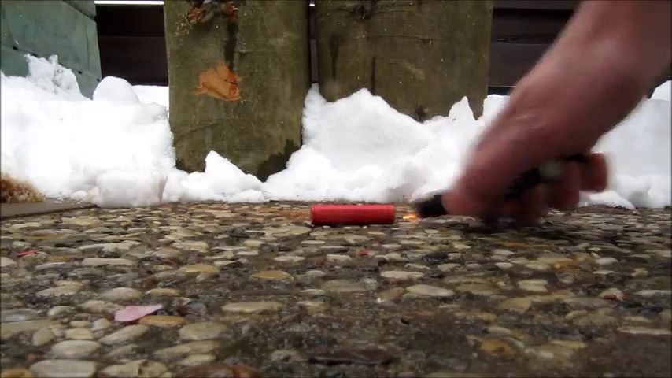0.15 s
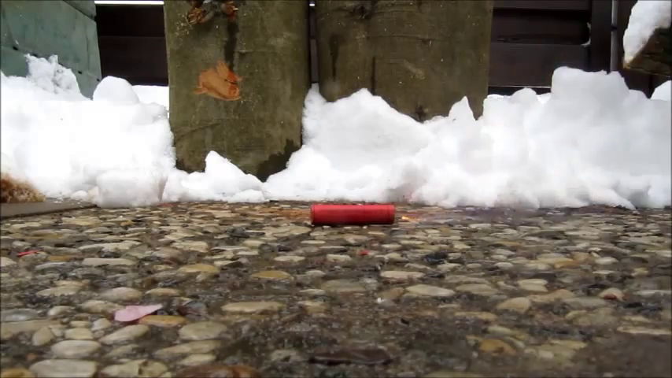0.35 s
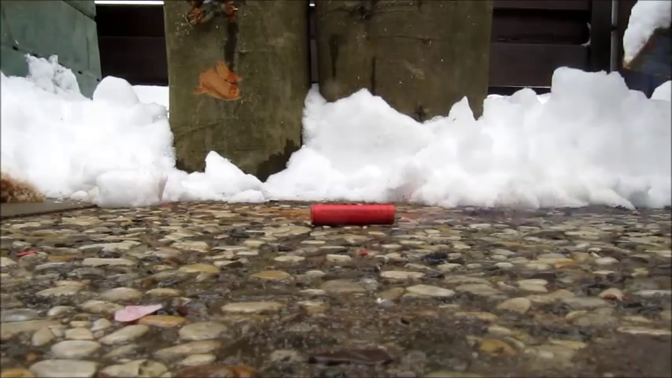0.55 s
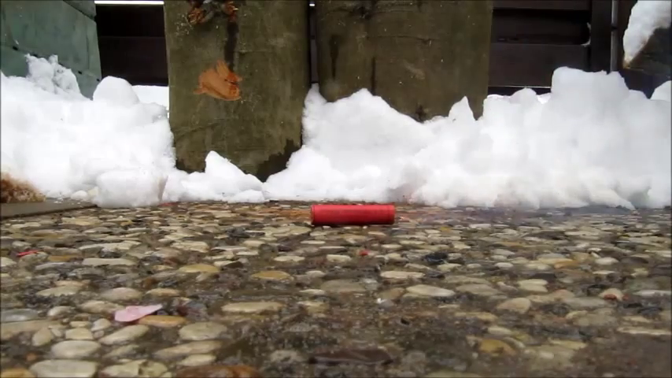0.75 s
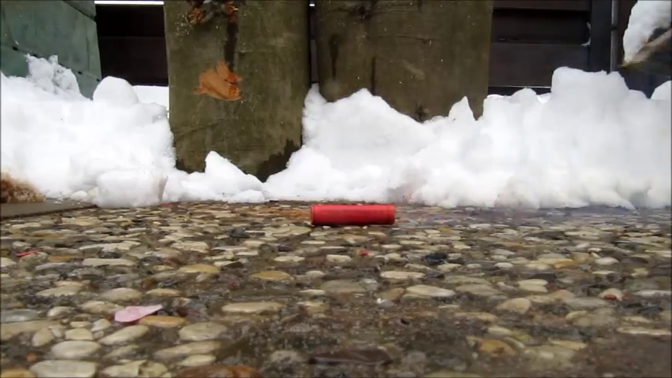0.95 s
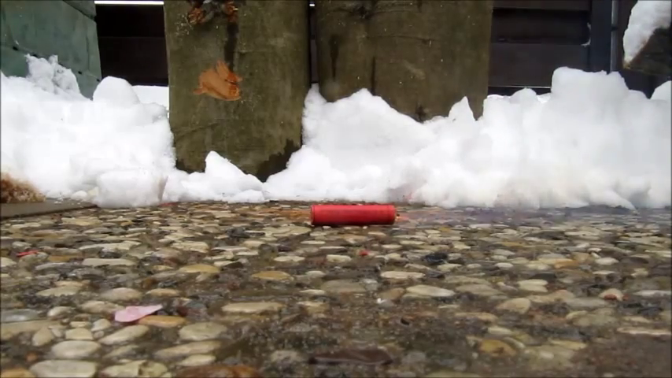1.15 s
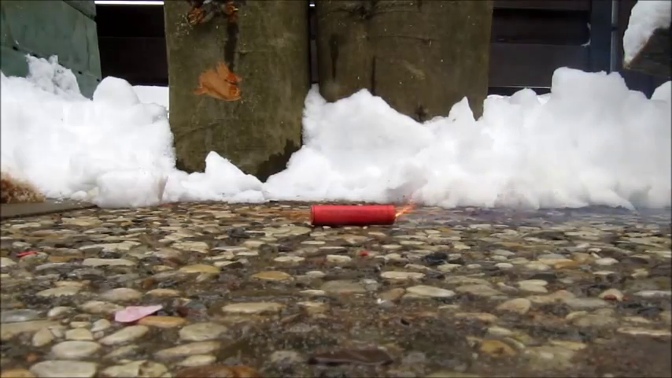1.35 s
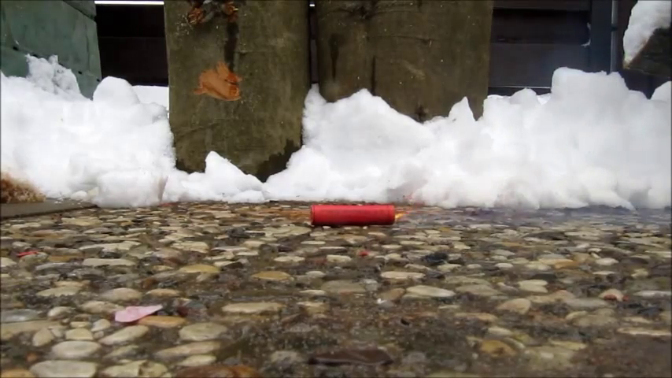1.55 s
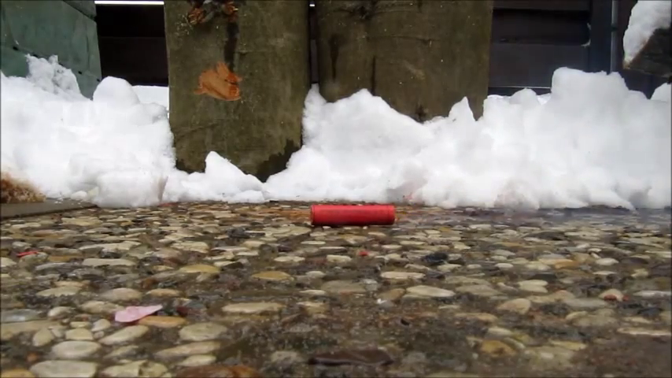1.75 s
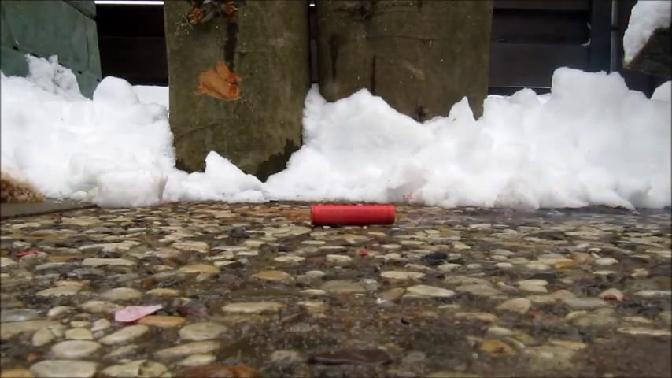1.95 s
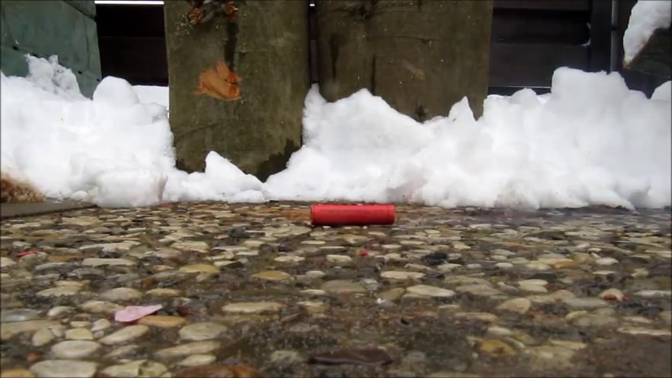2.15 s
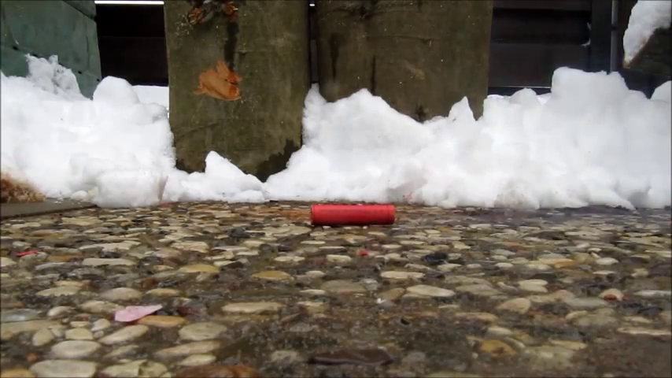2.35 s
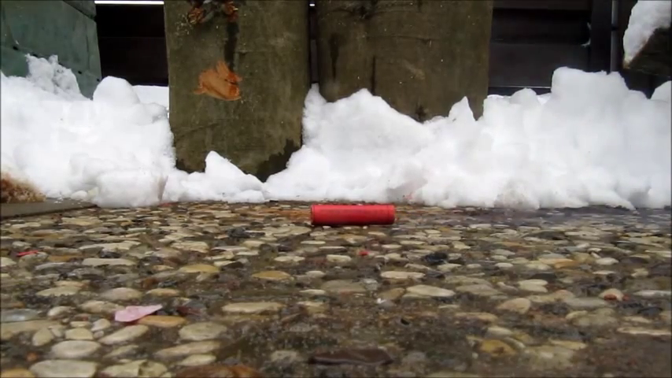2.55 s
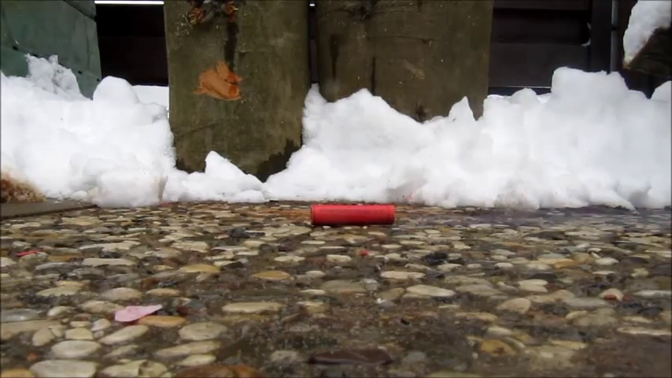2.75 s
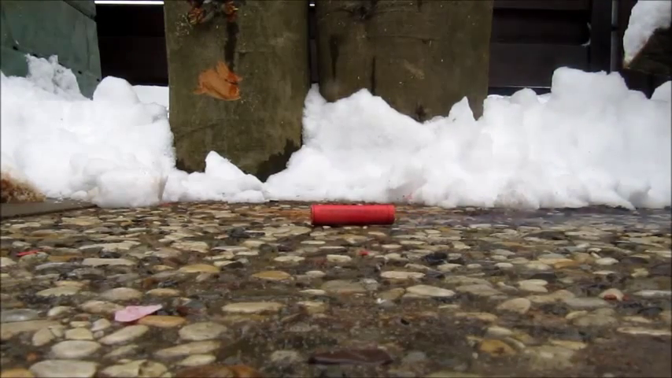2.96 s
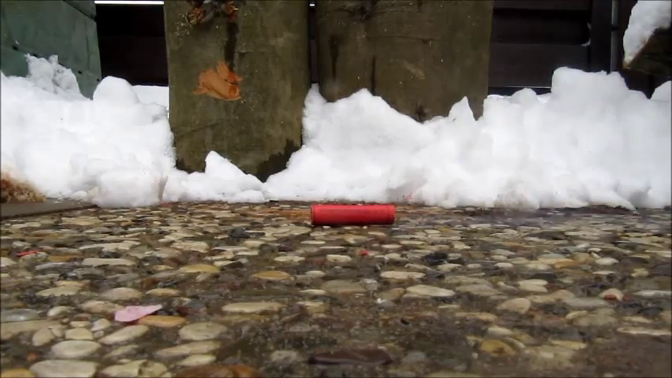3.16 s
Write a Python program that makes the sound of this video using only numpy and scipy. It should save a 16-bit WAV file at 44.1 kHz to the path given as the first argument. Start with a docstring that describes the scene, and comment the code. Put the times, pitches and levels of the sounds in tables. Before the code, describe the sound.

Firecracker fuse hisses and sputters harder and harder outdoors after a lighter clicks off, then chokes out

```python
"""Outdoors on pebbles between banks of snow, almost no echo: a gas lighter, shaped noise, hisses at a firecracker's
fuse and snaps shut with ringing knocks. The fuse, popping grains in a smooth hiss, sputters ever harder with a few
cracks of noise from large sparks, burns into the tube and blows a thin bright jet. Its gas buffets the small
microphone with low noise and single swings of pressure, then the flame chokes off to a faint smoulder.
Distant air, a quiet filtered noise, lies under it all."""
import sys
import numpy as np
from scipy import signal
from scipy.fft import rfft, irfft, next_fast_len
from scipy.io import wavfile
from scipy.ndimage import uniform_filter1d

SR = 44100
rng = np.random.default_rng(int(sys.argv[2]) if len(sys.argv) > 2 else 0)


def volts(x):
    """Linear amplitude factor 10**(x/20) for a level x in dB, scalar or array-like."""
    e = np.asarray(x, float) / 20
    return 10 ** e


def wrap_up_sound(samples):
    """Save the sound to the file named by the first command line argument, as 16-bit audio."""
    columns = np.atleast_2d(samples).T
    # keep every value between -1 and 1, then stretch to whole-number steps
    tamed = np.clip(columns, -1, 1)
    steps = np.round(tamed * 32767).astype(np.int16)
    wavfile.write(sys.argv[1], SR, steps)


N = 143325  # samples, 3.25 s


def evened(x):
    """Scales to rms 1."""
    return x / np.sqrt(np.mean(x ** 2) + 1e-20)


def curve(rows):
    """Joins (s, value) rows by straight lines."""
    s, value = np.transpose(rows)
    return np.interp(np.arange(N) / SR, s, value)


def colour(x, points):
    """Gives a sound the spectrum of (Hz, dB) points by a causal minimum-phase filter, at rms 1."""
    point_hz, point_db = np.transpose(points)
    hz = abs(np.fft.fftfreq(8192, 1 / SR))
    db = np.interp(np.log(hz + 1), np.log(point_hz + 1), point_db)
    log_gain = np.log(volts(np.maximum(db, -100)))
    # the Hilbert transform of the log gain is the phase that keeps the filter causal
    taps = np.fft.ifft(np.exp(np.conj(signal.hilbert(log_gain)))).real[:4096]
    return evened(signal.oaconvolve(x, taps)[:len(x)])


def chance(seconds):
    """Smooth random wander of rms 1: noise averaged twice over the given span."""
    size = max(round(seconds * SR), 2)
    once = uniform_filter1d(rng.standard_normal(N), size)
    return evened(uniform_filter1d(once, size))


def add(mix, s, sound):
    """Mixes a sound in at a time, cut at the end of the mix."""
    part = mix[round(s * SR):][:len(sound)]
    part += sound[:len(part)]


def lighter():
    """Gas flow as coloured noise, shut off as the lever snaps back in quick knocks of decaying modes."""
    # gas flow: time_s, level_db
    gas = [(0.0, -46.5), (0.086, -39.5), (0.196, -38), (0.205, -39)]
    # spectrum of the gas hiss: frequency_hz, relative_density_db
    gas_colour = [(180, -45), (300, -16.5), (331, -15), (404, -20), (431, -11), (553, -5.5), (720, -12),
                  (877, -10.5), (1370, -6.5), (1490, -9.5), (1870, -4.5), (4070, -5), (5850, -12.5),
                  (6900, -1), (7620, -7.5), (9140, -8.5), (10800, 0.5), (13400, -18), (15500, -29)]
    # knocks of the lever: start_s, peak_db
    snap = [(.2152, -22), (.21533, -11), (.21604, -12)]
    # ringing modes of the lever: pitch_hz, level_db (before differencing), t60_s
    lever = [(1900, -6, .004), (4200, -1, .0025), (5100, -4, .0025), (5900, 0, .0025), (7300, -5, .0025),
             (8800, -2, .005), (10000, 0, .0045), (11500, -8, .0025), (13800, -13, .0025)]
    gas_off_s, closing_s, rise_s = .216, 0.0051, .0001
    t, ring_s = np.arange(N) / SR, np.arange(800) / SR

    valve = np.clip((gas_off_s - t) / closing_s, 0, 1)
    out = colour(rng.standard_normal(N), gas_colour) * volts(curve(gas)) * valve

    knock = np.zeros(len(ring_s))
    for hz, db, t60 in lever:
        knock += volts(db - 60 * ring_s / t60) * np.sin(2 * np.pi * hz * ring_s)
    # differencing tilts the ring towards the treble
    knock = np.diff(knock * np.minimum(ring_s / rise_s, 1), prepend=0)
    knock /= abs(knock).max()
    for s, peak_db in snap:
        add(out, s, volts(peak_db) * knock)
    return out


def distant_air():
    """Distant outdoor air: steady noise, strongest in the low and middle range."""
    # spectrum of the air: frequency_hz, relative_density_db
    air_colour = [(88, -37), (150, -3.5), (384, -7.5), (457, 0), (939, -5.5), (1340, -10), (1760, -11),
                  (5000, -20), (12000, -31), (15500, -40)]
    return volts(-66.5) * colour(rng.standard_normal(N), air_colour)


def buffeting():
    """Gas striking the microphone: lumpy low rumble whose stronger gusts reach higher."""
    # strength of the gusts: time_s, level_db (before lumps and steadying)
    buffet = [(0.0, -70), (0.08, -66), (0.11, -58), (0.18, -59.5), (0.24, -68), (0.32, -60), (0.35, -67),
              (0.45, -66), (0.56, -68), (0.66, -61.5), (0.82, -59), (0.88, -65), (0.94, -56), (0.97, -56),
              (1.17, -56), (1.26, -51), (1.3, -54), (1.43, -50.5), (1.46, -46), (1.53, -52), (1.55, -39),
              (1.57, -47), (1.59, -35), (1.6, -40), (1.63, -57), (1.71, -44), (1.73, -55), (1.76, -40),
              (1.81, -46.5), (1.85, -40), (1.95, -33.5), (1.97, -40), (2.06, -35.5), (2.08, -44),
              (2.1, -36), (2.12, -37), (2.14, -63), (2.18, -41.5), (2.23, -41), (2.25, -39), (2.29, -48),
              (2.32, -35), (2.38, -47), (2.41, -39), (2.47, -45), (2.49, -50), (2.52, -53), (2.55, -39),
              (2.59, -51.5), (2.69, -52.5), (2.73, -37.5), (2.74, -38.5), (2.81, -53), (2.91, -64),
              (2.94, -62), (2.97, -47.5), (3.05, -76), (3.1, -62), (3.15, -63), (3.25, -60)]
    # spectrum of weak gusts: frequency_hz, relative_density_db
    soft = [(15, -32), (25, 5), (54, 7.5), (97, -2.5), (134, -8.5), (243, -10), (344, -13.5), (400, -19),
            (520, -43), (880, -120)]
    # spectrum of strong gusts: frequency_hz, relative_density_db
    strong = [(12, -52), (20, 7.5), (54, -3.5), (86, 3), (123, -2.5), (229, -7), (456, -18.5), (503, -26.5),
              (1000, -31), (1300, -32), (2200, -120)]
    soft_db, strong_db = -66, -31.5  # levels with the purely weak and purely strong colour
    lump_db, lump_s, steady_s = 1.5, .01, 0.015

    level_db = curve(buffet) + lump_db * chance(lump_s)
    strength = np.clip((level_db - soft_db) / (strong_db - soft_db), 0, 1)
    noise = rng.standard_normal(N)
    gust = (1 - strength) * colour(noise, soft) + strength * colour(noise, strong)
    # dividing by the local power steadies the gusts over this span
    size = round(steady_s * SR)
    power = uniform_filter1d(uniform_filter1d(gust ** 2, size), size)
    return volts(level_db) * gust / np.sqrt(abs(power) + 0.15)


def patchy(x):
    """Lets patches of the spectrum, about 1.2 kHz by 50 ms, swell and sink a little."""
    patch_db = 0.99  # rms
    z = signal.stft(x, nperseg=512)[2]
    across_pitch = uniform_filter1d(rng.standard_normal(z.shape), 14, 0)
    field = evened(uniform_filter1d(across_pitch, 8, 1))
    return signal.istft(z * volts(patch_db * field), nperseg=512)[1][:N]


def fuse():
    """Powder grains pop in a smooth, sputtering hiss; the colour thins as the fire moves into the tube."""
    # how hard the fuse burns: time_s, level_db
    burn = [(0.235, -41.5), (0.26, -39), (0.38, -36), (0.4, -34.5), (0.425, -35.5), (0.479, -31),
            (0.509, -35.5), (0.549, -31), (0.629, -31.5), (0.644, -31), (0.684, -30.5), (0.719, -30.5),
            (0.829, -25.5), (0.844, -29.5), (0.864, -29.5), (0.948, -28.5), (0.973, -26), (1.033, -29.5),
            (1.063, -26), (1.098, -29), (1.138, -26.5), (1.203, -26.5), (1.233, -23.4), (1.278, -27),
            (1.313, -23.5), (1.328, -28), (1.362, -26.5), (1.422, -25), (1.562, -25.5), (1.632, -23.5),
            (1.707, -23.5), (1.742, -27), (1.767, -23.5), (1.796, -23.5), (1.831, -26), (1.856, -24.5),
            (1.886, -28), (1.921, -28), (1.966, -29.5), (2.061, -25.5), (2.111, -27.5), (2.176, -23.5),
            (2.235, -25), (2.3, -23), (2.32, -26), (2.395, -25.5), (2.455, -26), (2.49, -28.5), (2.58, -27),
            (2.635, -27), (2.659, -29.5), (2.704, -27.5), (2.754, -30.5), (2.789, -26.5), (2.849, -28.5),
            (2.864, -29.5), (2.954, -28), (2.974, -28.5)]
    # the flame chokes and smoulders on: time_s, level_db
    smoulder = [(2.983, -39), (2.997, -50), (3.05, -51.5), (3.09, -54), (3.1, -49), (3.14, -52.5),
                (3.155, -54), (3.175, -57), (3.195, -58), (3.21, -53), (3.23, -59), (3.25, -54)]
    # where it burns: time_s, depth (0 in the open, 1 at the mouth, 2 inside the tube)
    burn_depth = [(.25, 0.074), (.5, 0.19), (.72, 0.061), (.83, .3), (.95, 0.043), (1.28, 0.41),
                  (1.36, 1.1), (1.55, 1.16), (1.75, 1.5), (1.9, 1.56), (2.05, 1.63), (2.15, 1.6),
                  (2.3, 1.7), (2.45, 1.85), (2.65, 1.69), (2.72, 1.69), (2.96, 1.66), (3.2, 1.6)]
    # spectrum burning in the open: frequency_hz, relative_density_db
    in_open = [(210, -30), (350, -21), (504, -15.5), (704, -22), (1010, -14.5), (1300, -14.5), (2070, -12),
               (2900, -10.5), (5300, -9), (7500, -6), (9090, -2.5), (10300, -7), (11300, -17.5),
               (12500, -19), (14000, -24.5), (15600, -27)]
    # spectrum burning at the mouth: frequency_hz, relative_density_db
    at_mouth = [(210, -39), (350, -22.5), (546, -15.5), (693, -22), (825, -18), (1420, -16), (2110, -13.5),
                (3790, -12.5), (5800, -11), (7800, -7), (9090, -2), (10400, -3.5), (11500, -6.5),
                (12700, -18), (14000, -24), (15600, -41)]
    # spectrum burning inside the tube: frequency_hz, relative_density_db
    inside = [(410, -68), (700, -35.5), (908, -31.5), (1360, -28.5), (1930, -26), (4090, -17.5),
              (5970, -12.5), (7800, -7.5), (9040, -2.5), (10300, -5), (11400, -9.5), (12500, -23),
              (13800, -28), (15600, -42)]
    pops_per_s, pop_spread_db, hiss_share = 5000, 3, 0.72  # hiss share of the power
    sputter_db, sputter_s, flutter_db, flutter_s = 0.69, 0.0051, 0.39, 0.075
    catch_s, catch_db = 0.14, -51  # the powder catches

    pop_size = volts(pop_spread_db * np.minimum(rng.exponential(1, N), 5))
    pops = (rng.random(N) < pops_per_s / SR) * pop_size * rng.choice([-1., 1.], N)
    drive = np.sqrt(1 - hiss_share) * evened(pops) + np.sqrt(hiss_share) * rng.standard_normal(N)
    drive = drive * volts(sputter_db * chance(sputter_s) + flutter_db * chance(flutter_s))

    depth = curve(burn_depth)
    tone = np.zeros(N)
    for place, spectrum in enumerate((in_open, at_mouth, inside)):
        nearness = np.maximum(1 - abs(depth - place), 0)
        tone += nearness * colour(drive, spectrum)
    level_db = curve([(catch_s - .1, -100), (catch_s, catch_db)] + list(burn) + list(smoulder))
    return patchy(tone) * volts(level_db)


def thumps():
    """Single puffs of gas on the microphone: one swing of pressure each, with a steep middle."""
    # puffs: middle_s, level_db (before the swing is faded), pitch_hz (negative sucks first)
    puffs = [(0.071, -51, -54), (0.315, -47, 52), (1.553, -39, -130), (1.593, -34, 107), (1.599, -31, -250),
             (1.835, -30, -170), (1.862, -21, -130), (1.896, -23, -150), (1.909, -26.5, -330),
             (2.003, -30, -130), (2.065, -27, 107), (2.101, -25, -110), (2.255, -33, -140),
             (2.318, -30, -150), (2.408, -30.5, -150), (2.426, -35, -220), (2.494, -31, 89),
             (2.552, -37.5, -110), (2.741, -28.5, 107), (2.965, -41, -45), (3.074, -45, 43),
             (3.083, -47, -82), (3.098, -44.5, -55), (3.026, -47, -49), (2.313, -38, -500),
             (1.845, -28, 398), (1.853, -40, -600), (1.902, -38, 302), (1.943, -28, -180),
             (3.062, -55, 500)]
    fade_turns, edge = 0.29, 0.26
    out = np.zeros(N)
    for s, level_db, hz in puffs:
        turns = np.arange(-2, 2, abs(hz) / SR)
        steepening = edge * np.sin(4 * np.pi * turns) * np.exp(-(turns / 0.14) ** 2)
        swing = np.sin(2 * np.pi * turns) + steepening
        swing = swing * np.exp(-(turns / fade_turns) ** 2)
        add(out, s - 2 / abs(hz), -np.sign(hz) * volts(level_db) * swing)
    return out


def sparks():
    """Each large spark is a short crack of noise in a wide band about its pitch."""
    # sparks: start_s, level_db (of the noise, before its rise and decay), pitch_hz, t60_s
    large_sparks = [(.784, -15, 3870, 0.004), (.802, -28, 8000, .008), (0.846, -17, 6600, 0.012),
                    (1.730, -28, 7960, .006), (3.071, -40, 9900, .01), (3.161, -39, 9450, 0.022),
                    (3.186, -36, 9400, 0.0047)]
    out, t = np.zeros(N), np.arange(1500) / SR
    for s, level_db, hz, t60 in large_sparks:
        band = [(hz / 4, -30), (hz / 1.4, -10), (hz, 0), (hz * 1.2, -10), (hz * 1.7, -40)]
        envelope = volts(level_db - 60 * t / t60) * np.minimum(t / 0.0002, 1)
        add(out, s, envelope * colour(rng.standard_normal(len(t)), band))
    return out


def yard(x):
    """Adds the few near echoes as phase turns in the spectrum, so delays fall between samples."""
    # echoes off the posts and the fence: delay_ms, gain (linear, signed)
    echoes = [(2.23, .15), (2.36, .07), (2.425, -.13), (3.3, .07), (3.56, -.06), (3.82, .08), (4.07, -.09),
              (6.7, .05)]
    size = next_fast_len(N + 1000)
    hz = np.fft.rfftfreq(size, 1 / SR)
    response = 1
    for ms, gain in echoes:
        response = response + gain * np.exp(-2j * np.pi * hz * ms / 1000)
    return irfft(rfft(x, size) * response, size)[:N]


def scene():
    """Lighter, fuse and sparks with their echoes; gusts, thumps and air reach the microphone directly."""
    echoed = yard(lighter() + fuse() + sparks())
    return (echoed + buffeting() + thumps() + distant_air())[None]


def low_pass(x):
    """Removes everything above the highest recorded frequency."""
    return signal.sosfilt(signal.butter(12, 16440, fs=SR, output="sos"), x)


def record(dry):
    """The camera's band limit: a steep low-pass at 15.74 kHz."""
    edge = signal.firwin(1023, 15740, window=("kaiser", 9), fs=SR)
    mix = signal.oaconvolve(dry, edge[None], "same")
    return low_pass(mix)


dry = scene()
out = record(dry)
wrap_up_sound(out)
```